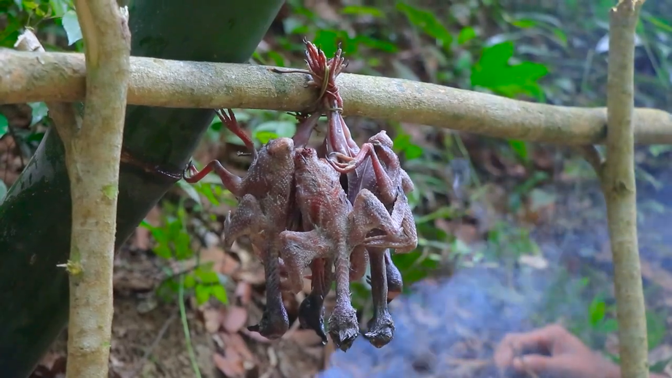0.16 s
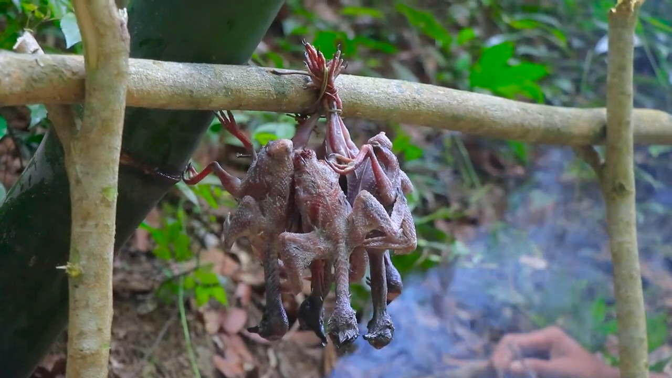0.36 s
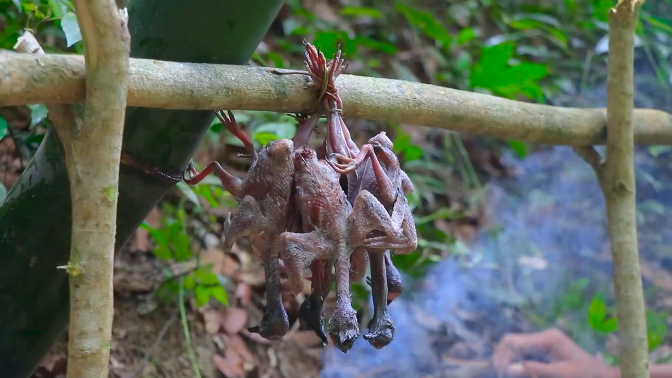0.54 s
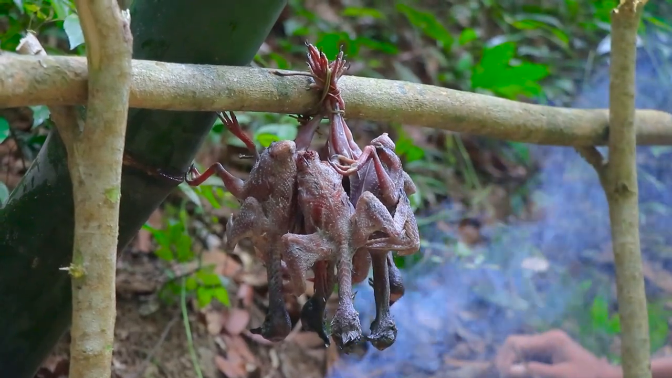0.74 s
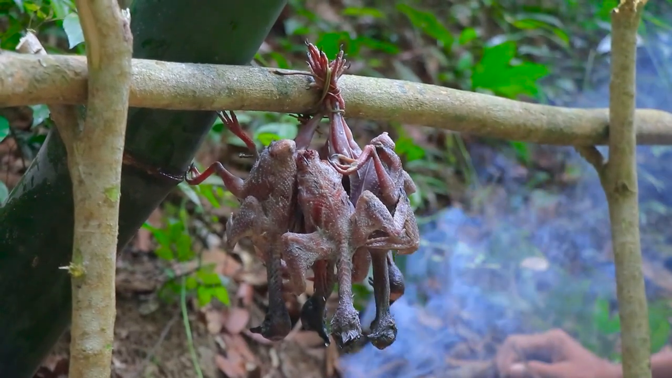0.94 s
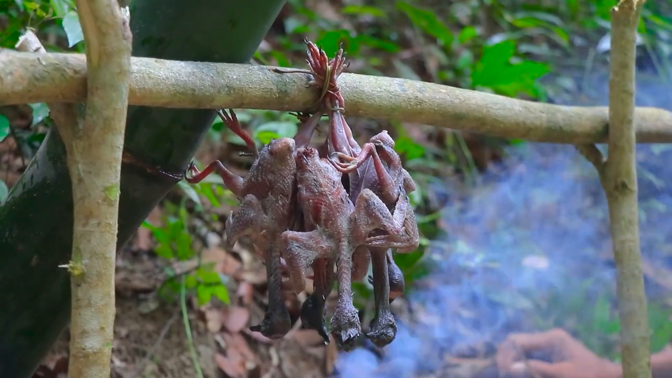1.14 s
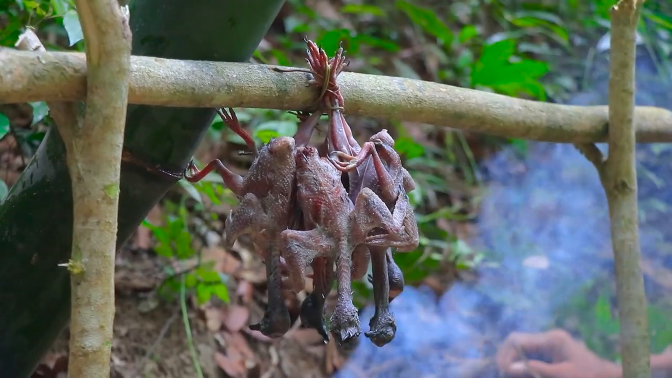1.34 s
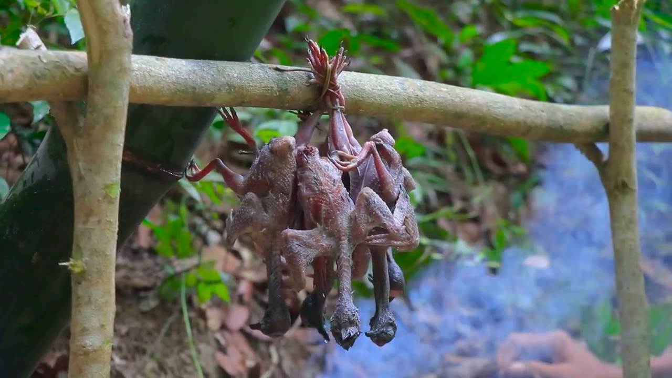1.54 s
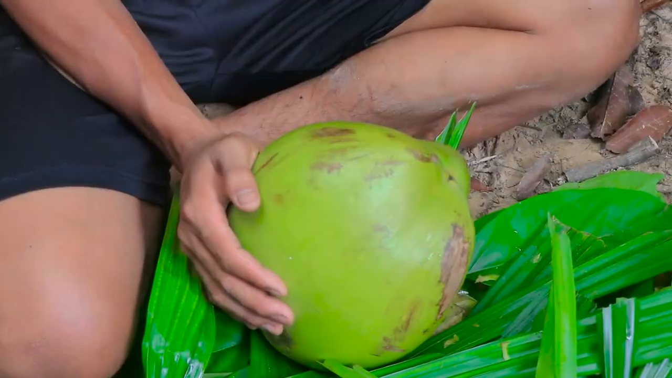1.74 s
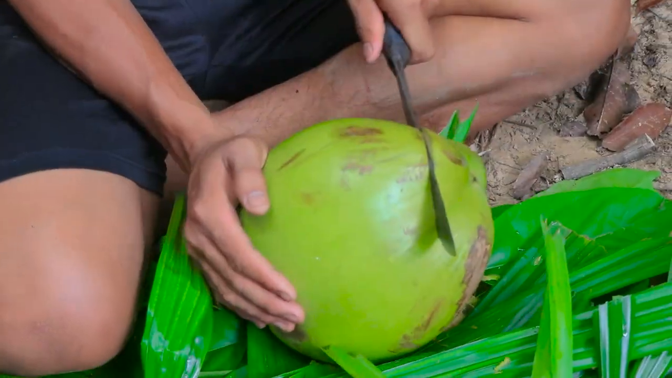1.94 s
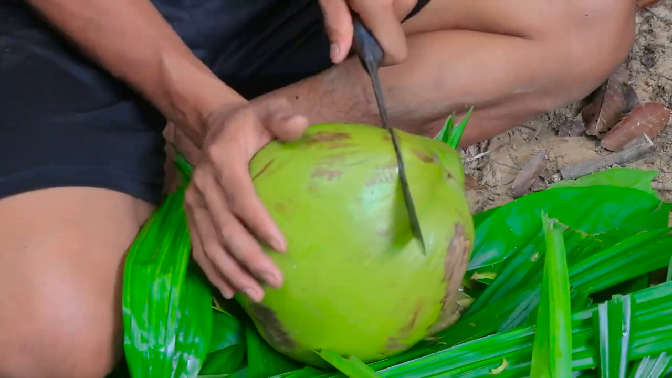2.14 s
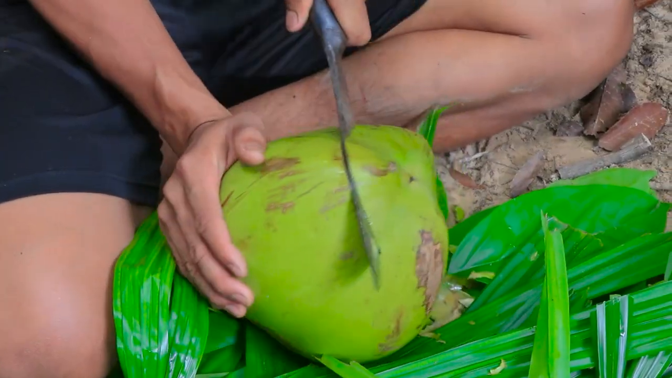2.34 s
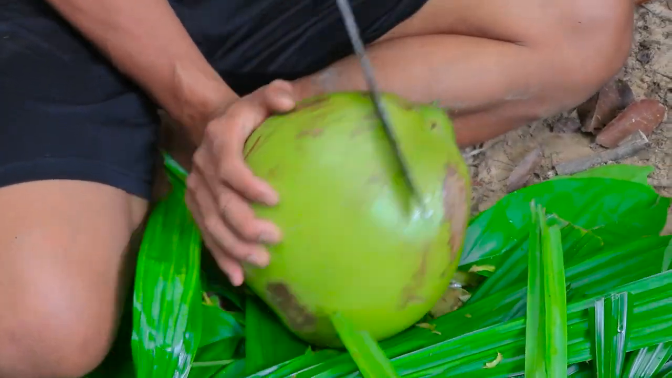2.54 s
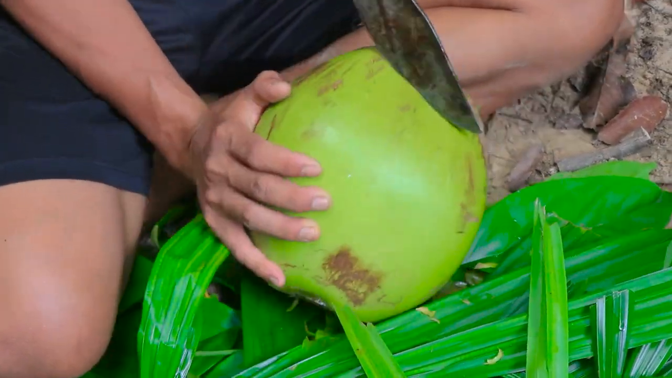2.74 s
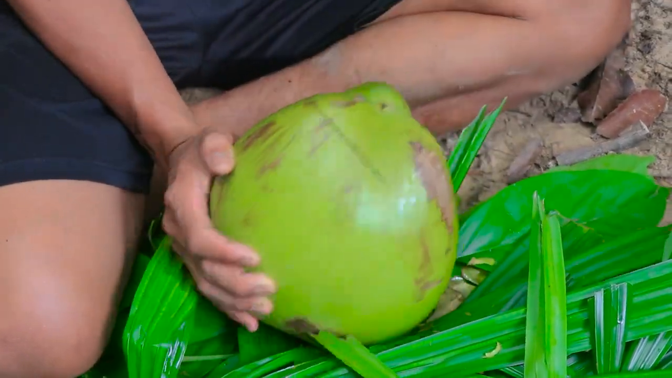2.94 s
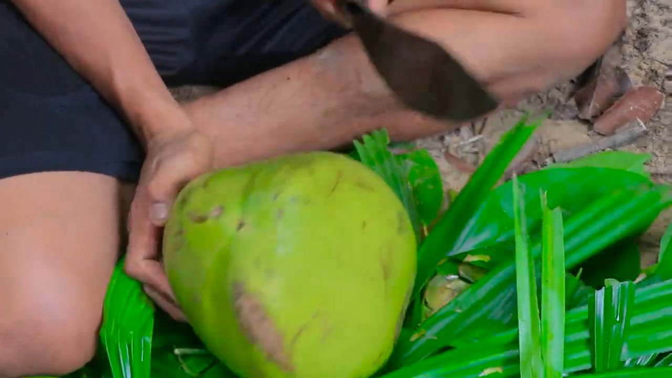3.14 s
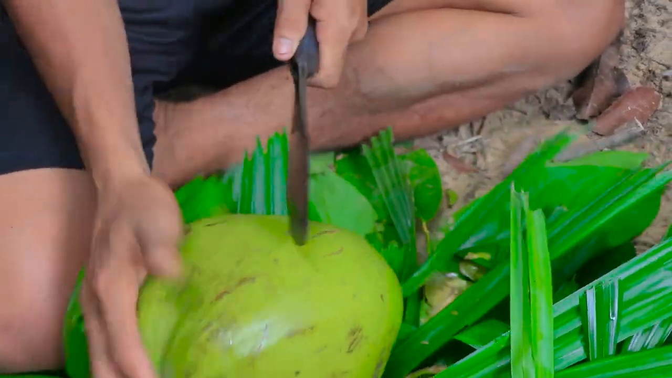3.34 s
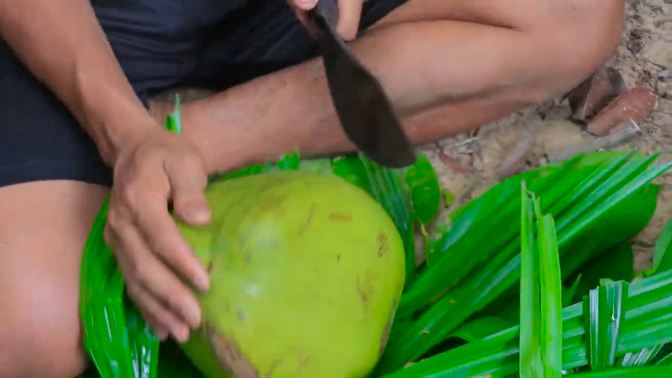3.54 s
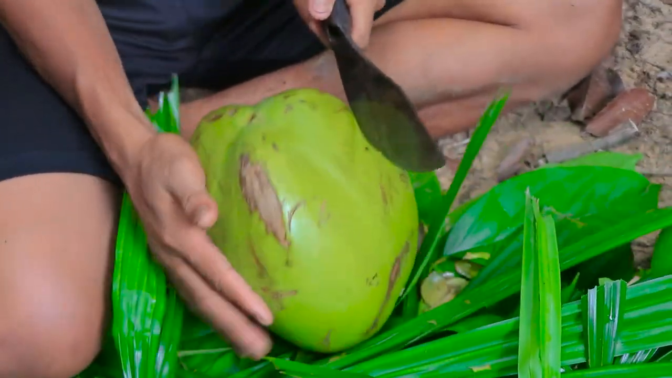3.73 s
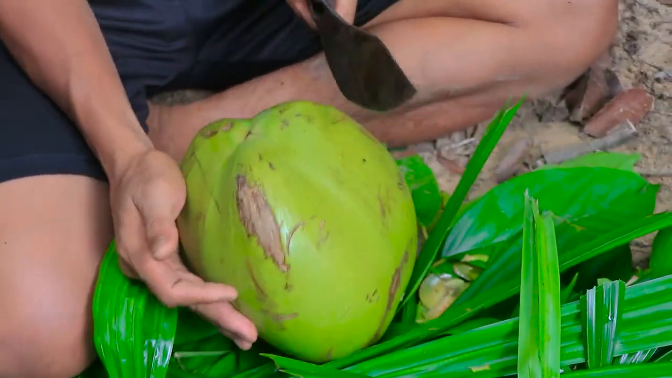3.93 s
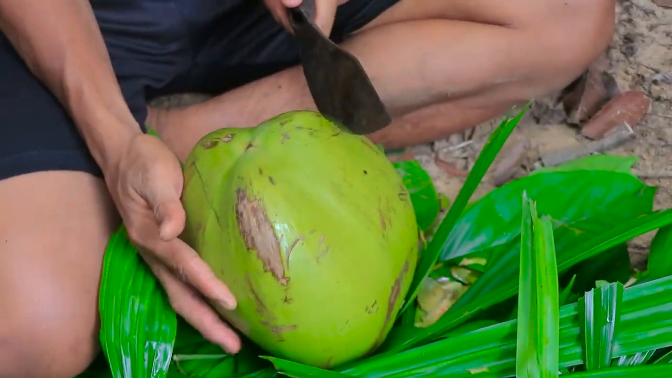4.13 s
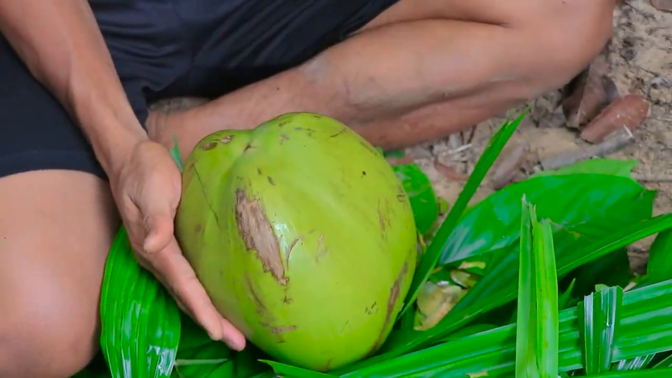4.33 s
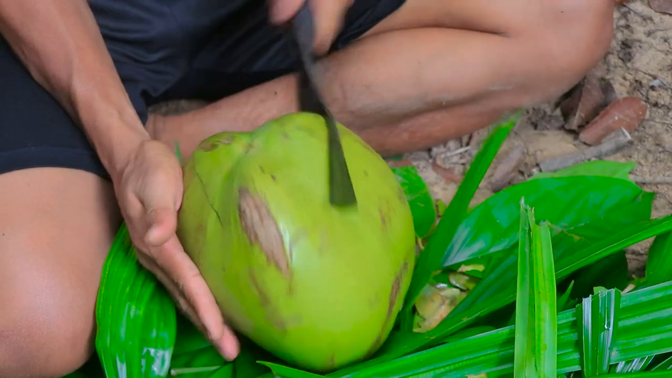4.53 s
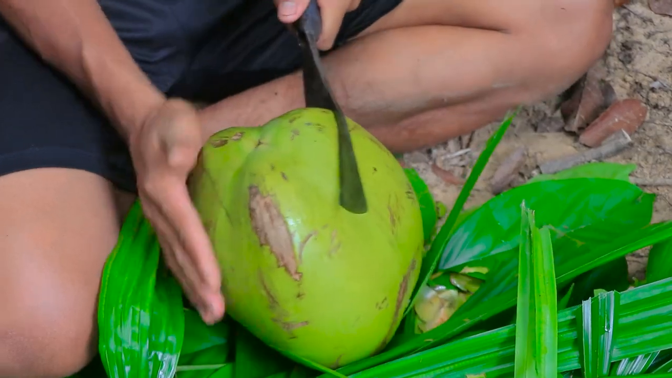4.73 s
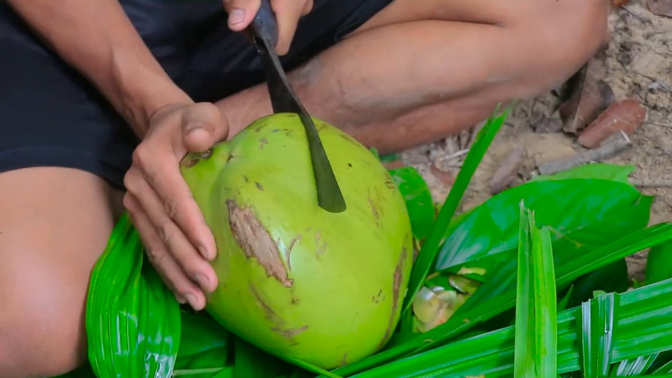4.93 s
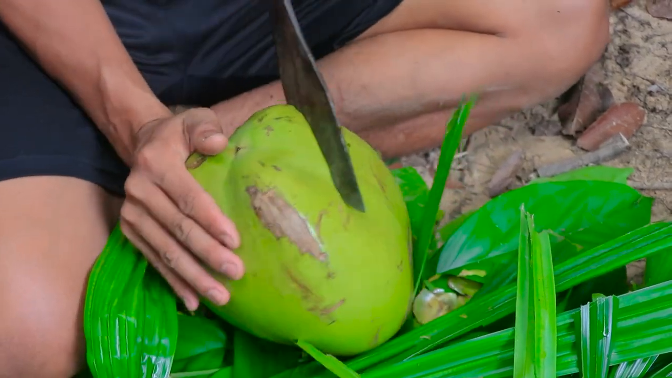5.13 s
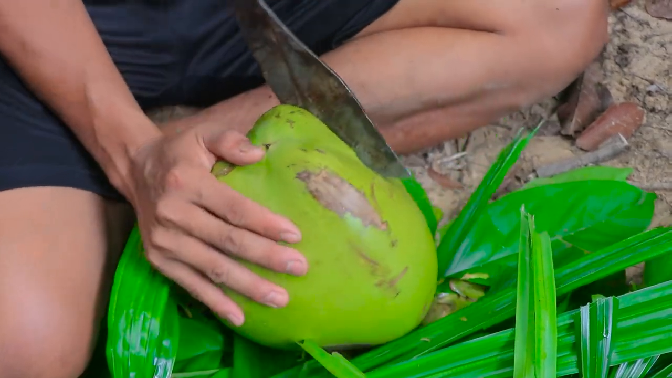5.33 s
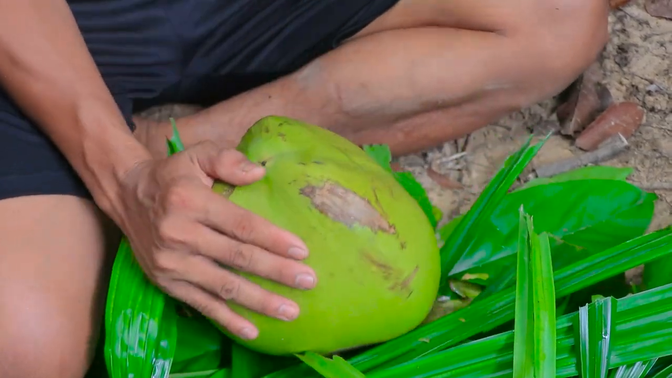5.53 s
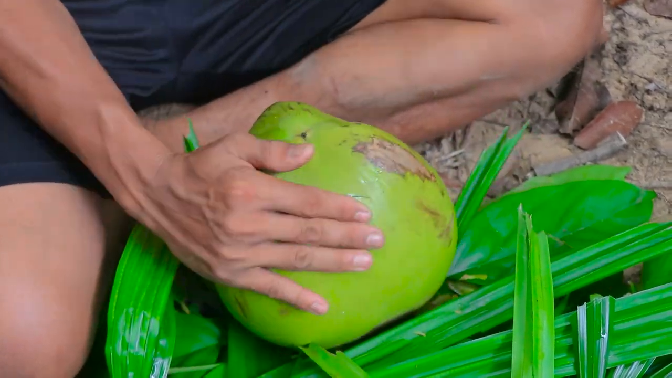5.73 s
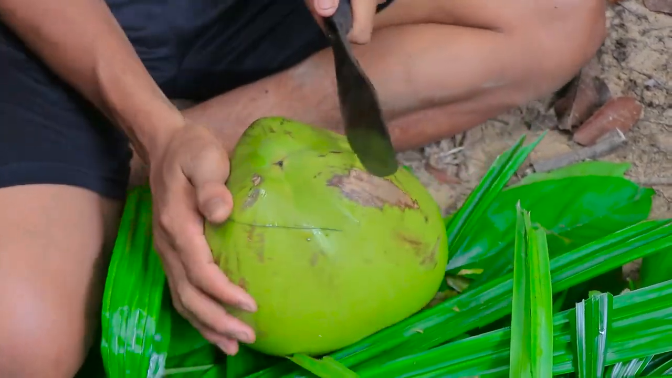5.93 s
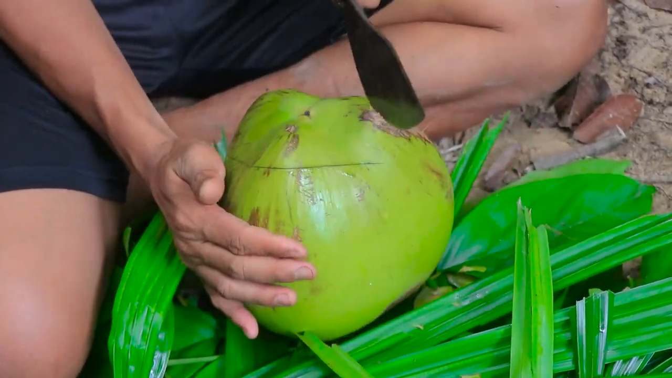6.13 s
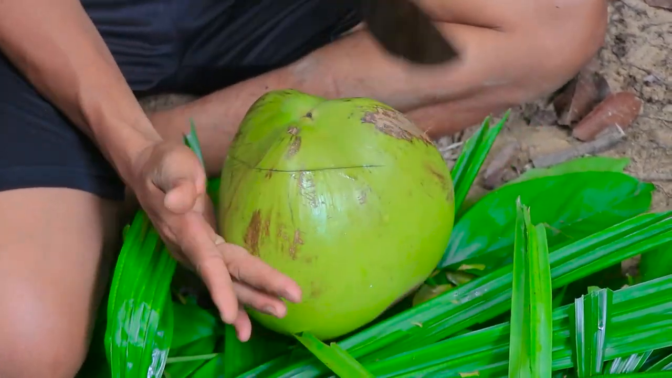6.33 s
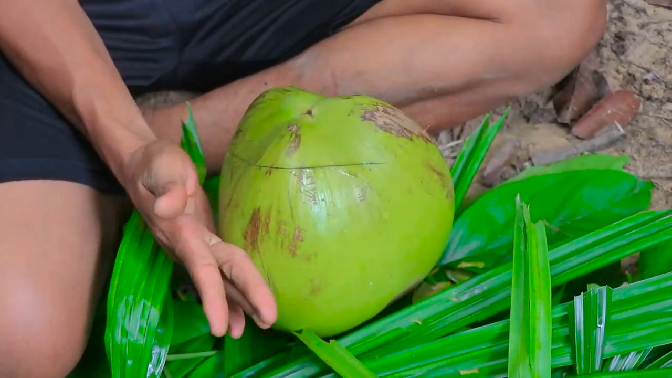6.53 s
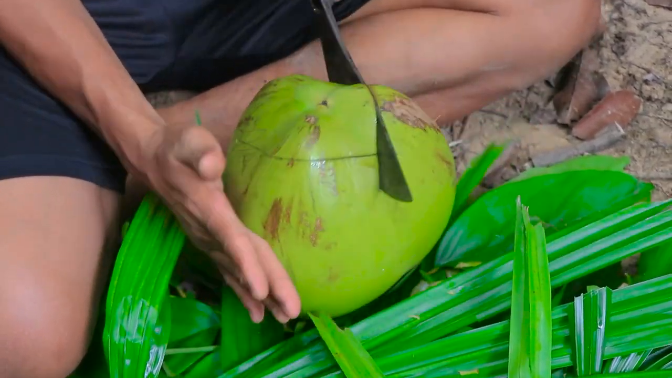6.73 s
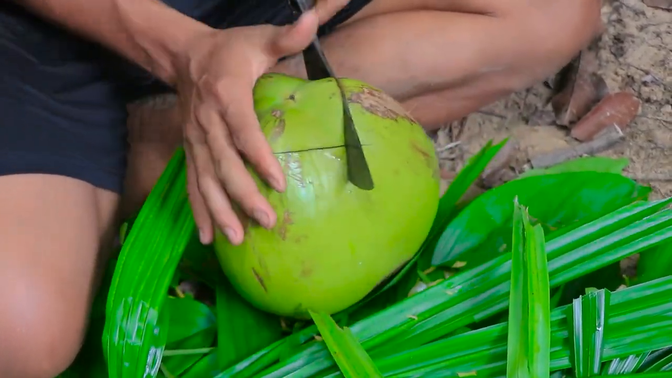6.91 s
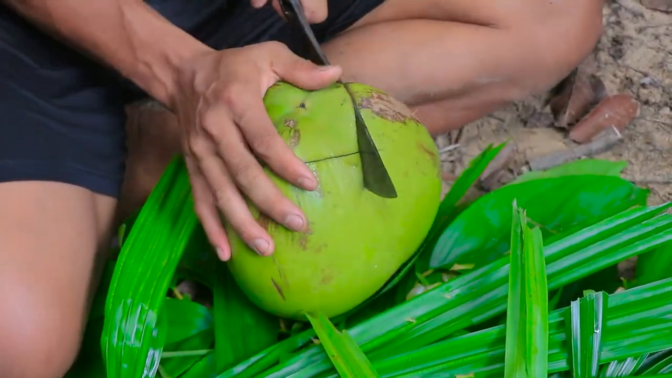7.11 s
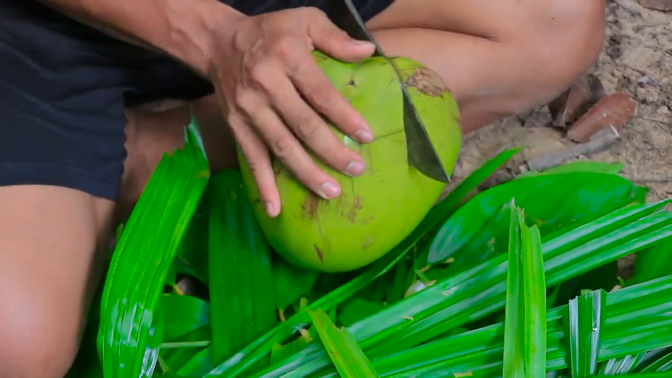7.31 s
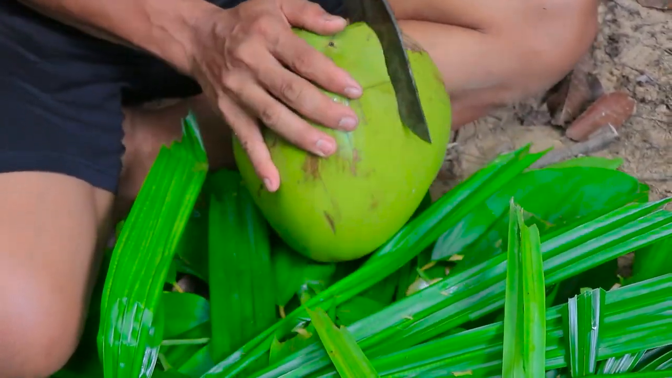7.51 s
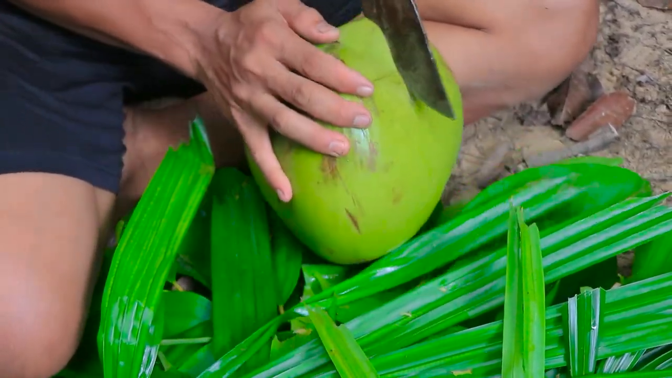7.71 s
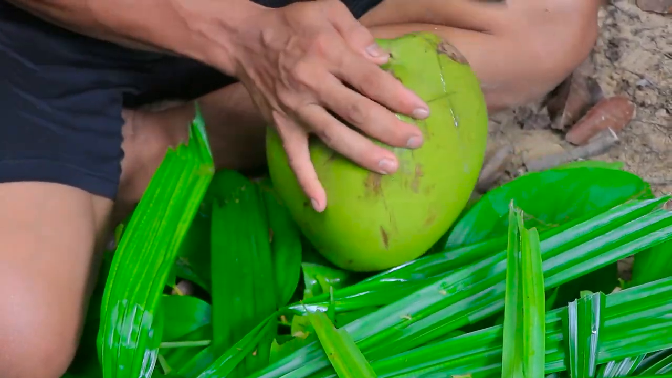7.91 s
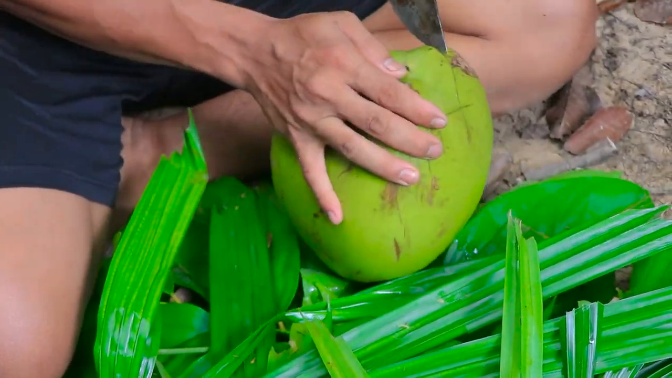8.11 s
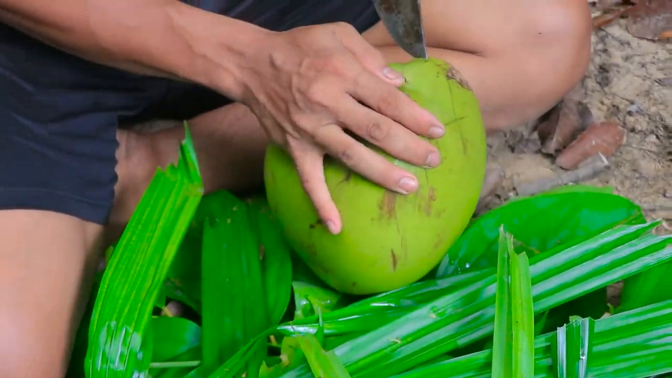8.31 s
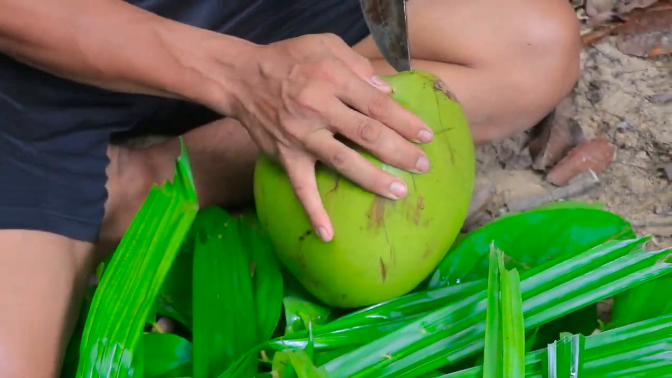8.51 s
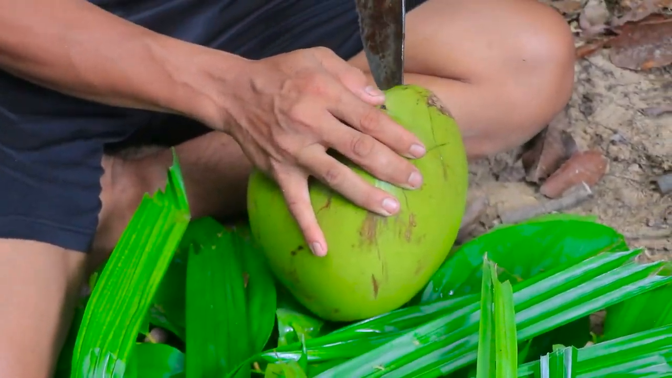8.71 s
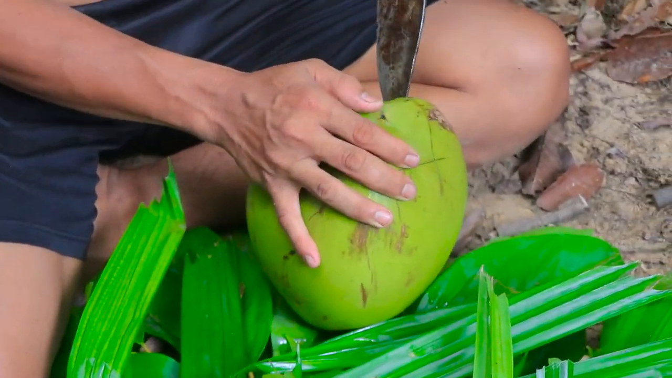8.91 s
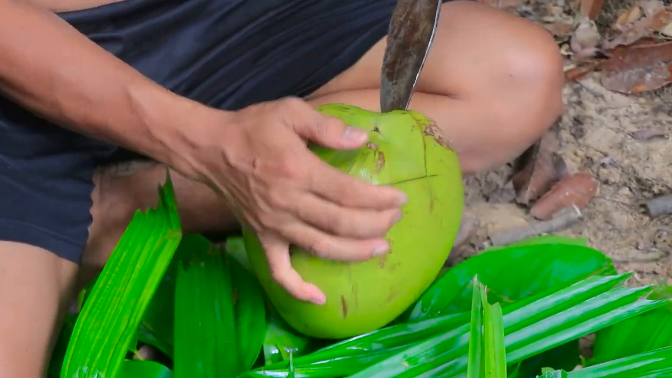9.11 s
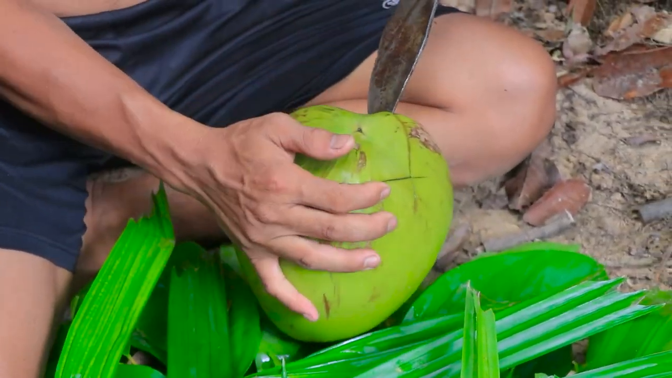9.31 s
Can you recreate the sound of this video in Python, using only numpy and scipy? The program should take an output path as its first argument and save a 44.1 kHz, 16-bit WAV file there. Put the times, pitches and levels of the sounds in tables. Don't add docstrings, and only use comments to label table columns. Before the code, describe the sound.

For the first 1.7 seconds, a low fire rumbles and hisses quietly; a bird gives a short note and a falling whistle at the very start, with dry rustles and small snaps. A fainter call comes just before the cut at 1.7, where sharp snaps sound close to one side. Quieter forest air follows. At 1.9 a knife chops a green coconut with a loud crack and hollow thud. From 2.2 to 2.8 the blade rubs and squeaks in fibre. Hands turn the nut around 2.8 to 4.2, with busy knocks, leaf crinkles and brittle snaps, thickest near 3.4. A second, mostly tearing chop lands at 4.6; the blade is wrenched and squeaks free by 5.5. Light bumps lead to the third thudding chop at 6.7. Fibre rubs and rustling at 7.4 to 7.8 fade into sparse ticks and soft leaf movement until about 9.4.

```python
import sys
import numpy as np
from scipy import signal
from scipy.io import wavfile

SR = 44100
rng = np.random.default_rng(int(sys.argv[2]) if len(sys.argv) > 2 else 0)


def natural_amplitude(level_db):
    exponent = np.asarray(level_db, float) / 20
    return 10 ** exponent


def store_pcm(level_fs):
    pcm = np.round(np.clip(level_fs, -1, 1) * 32767).astype(np.int16)
    wavfile.write(sys.argv[1], SR, np.atleast_2d(pcm).T)


N = 412776

# frequency in Hz, level in dB per Hz.
AIR = [(15, -39), (25, 0), (87, -3.5), (242, -8.5), (451, -8.5), (796, -13), (2840, -18), (5880, -31),
       (10700, -21), (16000, -33)]
# frequency in Hz, level in dB per Hz.
FIRE = [(15, -44), (25, 0.5), (92, -4), (309, -15.5), (354, -22), (384, -13.5), (489, -20), (887, -18.5),
        (6210, -32), (13600, -20.5), (16000, -20.5)]
AIR_DB, FIRE_DB, FIRE_END_S = -48.5, -44.5, 1.735
# frequency in Hz, width in Hz, level in dB.
HUMS = [
    (83, 10.3, -56),
    (100, 9, -51),
]
# time in seconds, pitch in Hz, level in dB.
BIRD = [
    [(0, 992, -38.5), (.045, 996, -40), (.07, 950, -53)],
    [(.152, 1270, -38), (.165, 1248, -39), (.18, 1217, -46), (.22, 1152, -46.5), (.25, 1108, -48.5),
     (.35, 1134, -52), (.385, 1130, -49)],
    [(1.658, 1060, -55), (1.685, 1140, -53), (1.71, 1110, -54), (1.735, 1080, -58)],
]

# frequency in Hz, level in dB per Hz.
LEAF = [(88, -34), (150, -16), (209, -16.5), (466, -15.5), (662, -17.5), (1190, -12), (1500, -8.5),
        (6020, -15.5), (8560, 0.5), (12900, -6), (16000, -18)]
# frequency in Hz, level in dB per Hz.
FIBRE = [(120, -69), (250, -38), (387, -12), (482, -23), (1080, -9.5), (1370, -24.5), (1810, -6.5),
         (4900, -12), (6200, -22), (9930, -17), (16000, -29)]
# frequency in Hz, level in dB per Hz.
TEAR = [
    [(210, -35), (350, -1.5), (3450, -5), (6030, -18), (7190, -11), (13400, -14), (16000, -21)],
    [(210, -25), (350, -13), (1500, -4), (4310, -5.5), (6970, -8.5), (13400, -16), (16000, -30)],
    [(290, -42), (500, -7.5), (1550, -5), (4870, -10), (7640, -14), (9770, -9), (16000, -21)],
]
# frequency in Hz, left-right likeness (1 = mono).
AIR_ALIKE = [(60, 1), (380, 0.39), (2380, -0.13), (15000, -0.11)]
# frequency in Hz, left-right likeness (1 = mono).
LEAF_ALIKE = [(60, 1), (380, 1), (2380, 0.37), (15000, 0.024)]
# frequency in Hz, left-right likeness (1 = mono).
CUT_ALIKE = [(60, 0.87), (380, 0.98), (2380, 0.84), (15000, 0.41)]
# frequency in Hz, left over right in dB.
LEAN = [(60, -1.5), (380, 0.5), (2380, -2), (15000, -4)]
LOW_HZ, HIGH_HZ = 700, 5800
NUT_HZ, NUT_WIDTH_HZ = 430, 183
SLOT_HZ, SLOT_WIDTH_HZ = 1410, 190

# time in seconds, hum in dB.
ROLL = [(0, -56), (.283, -55.5), (1.698, -58.5), (1.95, -42.5), (1.99, -50), (3.414, -42), (3.53, -41.5),
        (3.59, -35.5), (4.332, -69.5), (4.649, -57), (6.6, -62.5), (6.72, -47.5), (7.05, -68),
        (7.485, -46.5), (7.744, -49.5), (7.836, -43.5), (8.8, -62.5), (9.3, -54)]
# peak in seconds, peak in dB, rise in seconds, fall in seconds.
STIRS = [(.347, -28, 0.074, 0.047), (.64, -44, 0.46, 0.14), (.868, -37.5, 0.04, 0.21),
         (1.39, -50, 0.27, 0.045), (1.685, -48, .03, .06), (1.89, -39.5, 0.045, 0.19),
         (2.28, -48, 0.037, .1), (2.36, -36, 0.073, 0.089), (2.598, -35.5, 0.12, 0.18),
         (2.83, -37, 0.19, 0.069), (3.03, -45, 0.19, 0.49), (3.33, -31, 0.34, 0.13), (3.7, -39, 1, 0.42),
         (4.11, -50, 0.33, 0.081), (4.625, -42, 0.032, 0.12), (4.69, -42.5, 0.088, .045),
         (5.0, -50.5, .6, .4), (5.366, -39.5, 0.13, .1), (5.519, -43.5, 0.17, .04), (5.739, -43, 0.17, .1),
         (5.948, -46, 0.12, 0.079), (6.08, -46, .07, 0.36), (6.768, -40, .1, .04), (7.02, -46, 0.26, 0.057),
         (7.19, -38.5, .04, .5), (7.685, -40, 0.53, 0.02), (7.818, -39.5, 0.07, 0.47),
         (8.41, -45, 0.45, 0.1), (8.598, -50, 0.069, 0.2), (8.93, -49, .04, .03), (9.215, -44, .15, 0.072),
         (9.34, -49, .08, .1)]
STIR_DROP_DB = 12
STIR_ROUNDNESS = 1.36
BED_DB, BED_FOLLOWS = -51, 0.94
HISS_DB, HISS_FOLLOWS = -42.5, 0.86
STIR_HUM_DB = -13.5
DRY_LITTER_HZ = 2200

# start in seconds, length in seconds, first dB, last dB.
BITES = [(1.886, 0.024, -30, -31), (2.224, 0.026, -39, -46), (2.25, 0.04, -44, -32),
         (2.272, 0.052, -33.5, -45.5), (5.9, 0.05, -40, -35.5), (7.386, .026, -31, -26),
         (7.404, .065, -23.5, -34.5)]
# start in seconds, length in seconds, first dB, last dB.
SLIDES = [(2.476, 0.023, -47, -31), (2.49, .095, -29, -33), (2.73, 0.074, -47, -38),
          (2.79, 0.033, -32, -26), (7.459, 0.063, -33.5, -36), (7.513, .062, -36, -30),
          (7.567, .13, -36.5, -37), (7.743, .036, -34, -40), (5.0225, .0275, -26, -31),
          (5.044, .028, -34, -31)]
# start in seconds, length in seconds, first dB, last dB.
WRENCHES = [
    (5.066, .1, -27, -24),
    (5.163, .06, -30, -30),
    (5.214, .016, -33, -44),
]
# start in seconds, length in seconds, first dB, last dB.
SKIDS = [
    (7.774, .03, -33.5, -31.5),
]
# start in seconds, length in seconds, first dB, last dB.
TWISTS = [
    (5.455, .03, -25.5, -27),
    (5.48, .022, -26, -32),
]
# start in seconds, length in seconds, first dB, last dB.
DRAGS = [(3.245, .055, -41, -40), (7.385, .035, -39, -39), (7.47, .04, -42, -42), (8.58, .14, -57, -55),
         (2.585, .14, -46, -48)]
# hollow in dB, hiss in dB, slot in dB, edge in seconds, thin below in Hz.
BITE = (-3.5, -15, -5.5, .006, 300)
SLIDE = (-10.5, -7.5, -7, .006, 300)
WRENCH = (-9, -3, -4, .004, 300)
SKID = (-27, 4, -12, .008, 1600)
TWIST = (-25, -1.5, -20, .003, 1500)
DRAG = (-20, -20, 6, .01, 1000)
# start in seconds, length in seconds, slips per second at
# start in Hz, at end in Hz, level in dB, tilt in dB per overtone.
SQUEAKS = [(2.757, 0.043, 1365, 1300, -34.5, -2.5), (2.49, .012, 720, 880, -30, -1.5),
           (2.4995, .015, 1150, 1330, -27, -6), (2.509, .009, 810, 840, -33, 0.1),
           (5.455, .013, 1300, 1620, -26, -2), (5.468, .016, 1560, 1640, -22.5, -16)]

# time in seconds, peak in dB, colour in Hz, thump in dB above peak, bright in # dB
POPS = [
    (1.7385, -16, 700, -5, -13),
    (1.782, -28, 600, -6, -20),
    (1.7535, -29, 1100, -6, -24),
    (1.773, -21.5, 1680, -6.5, -3),
    (1.789, -16, 5700, -23, -1.5),
]
POPS_PAN_DB, POP_THUMP_HZ = -23.5, 170
# time in seconds, peak in dB, colour in Hz, bright in dB above peak.
SNAPS = [(0.218, -33, 1063, -2), (0.261, -18, 1130, -29), (0.905, -28, 4500, -4), (0.992, -27, 2600, -8),
         (1.298, -39, 870, 6), (1.422, -25.5, 4300, -6), (2.02, -26, 1300, -28), (2.122, -27, 1590, -11.5),
         (2.561, -13, 1700, -25), (2.922, -27, 1440, -12), (7.928, -31, 4000, 0), (3.406, -11.5, 2870, -21),
         (3.437, -11, 2400, -13), (3.585, -19, 5200, -8), (3.59, -9.5, 1080, -31), (3.669, -25, 6500, -4),
         (5.318, -12.5, 3800, -20), (5.396, -26, 2200, -19), (5.426, -17, 3100, -25),
         (5.637, -24.5, 2190, -26), (5.974, -33, 4630, -2), (6.752, -23, 2920, -30),
         (6.98, -28.5, 3100, -4), (8.07, -22, 2950, -27), (8.237, -24, 2860, -21), (8.28, -18, 3600, -11),
         (8.561, -24, 2500, -20), (8.933, -33, 6000, -2)]
# time in seconds, peak in dB, colour in Hz, bright in dB above
MORE_SNAPS = [(2.5024, -16, 2590, -18), (2.5184, -18, 2320, -18), (2.5284, -16, 1600, -18),
              (2.9981, -28, 1730, -18), (3.2021, -22, 2160, -18), (3.3094, -20, 2260, -18),
              (3.4514, -21, 1400, -18), (3.478, -24, 1500, -18), (3.7549, -23, 3580, -18),
              (3.911, -34, 3240, -18), (5.245, -32, 3430, -18), (5.3393, -28, 2280, -18),
              (7.4095, -17, 2440, -26), (7.5906, -21, 2940, -18), (8.1404, -35, 1560, -18),
              (9.0438, -39, 2510, -18), (9.1092, -37, 3060, -18), (9.1401, -36, 2400, -18)]
# time in seconds, peak in dB, colour in Hz, bright in dB above peak.
CLICKS = [(3.4368, -6, 4200, -10), (3.4372, -6, 1900, -30), (1.888, -16.5, 1300, -25),
          (.381, -30, 2400, -20), (2.145, -33, 2300, -20), (3.0313, -26, 1550, -18),
          (3.5516, -26, 3380, -18), (3.602, -21, 6000, -6), (7.303, -28, 1920, -18),
          (7.3928, -20, 1520, -28), (7.9545, -30, 1200, -18), (8.3172, -31, 1500, -18),
          (7.1588, -33, 2020, -18)]
# time in seconds, peak in dB, colour in Hz, hollow in dB above peak.
TAPS = [(2.23, -30, 2110, 2.5), (2.237, -22.5, 830, -14), (2.87, -18, 1610, -20), (2.897, -17, 1300, -20),
        (3.165, -19, 1420, -10), (3.295, -14.5, 1450, -12), (3.346, -12.5, 1680, -8),
        (3.358, -20, 3550, -13.5), (3.638, -15, 900, -8.5), (3.682, -12, 1120, -10),
        (6.175, -26, 2090, -12), (8.187, -36, 1430, 2.5)]
# time in seconds, peak in dB, colour in Hz, hollow in dB above peak.
BUMPS = [(0.381, -25, 1340, -14), (3.603, -21, 1010, -4), (3.785, -17.5, 1820, -14), (4.029, -23, 815, -2),
         (4.145, -21, 1360, -17), (5.957, -25.5, 1380, -15), (6.204, -32, 1440, -4), (4.046, -26, 1200, -8),
         (3.4365, -11, 6000, -30), (3.53, -26, 800, -6), (8.19, -28, 2500, -20)]
SNAP_HOLLOW_DB, TAP_BRIGHT_DB, BUMP_BRIGHT_DB, MORE_SNAPS_LIFT_DB = -26.5, -26, -9, 4

# start in seconds, pitch in Hz, level in dB, push in seconds, 60 dB decay in seconds.
RINGS = [(1.888, 375, -13.5, 0.0032, 0.06), (1.889, 944, -17, 0.00045, 0.031),
         (1.898, 417, -13.5, 0.011, 0.03), (2.23, 205, -36.5, 0.021, 0.1), (2.82, 1330, -30, 0.0028, .015),
         (7.746, 1594, -27.5, 0.0077, 0.033), (7.792, 2300, -27, 0.0042, .02),
         (2.82, 11000, -29, 0.0024, 0.055), (3.17, 454, -26, .008, 0.063), (3.318, 500, -22, 0.0015, 0.05),
         (3.687, 1180, -26, 0.0014, 0.021), (3.591, 1100, -17.5, 0.002, .02),
         (3.687, 430, -25, 0.0049, 0.16), (3.76, 397, -25.5, 0.0078, 0.034), (5.146, 1372, -19, 0.02, .008),
         (5.492, 3400, -36, .003, 0.18), (5.97, 4600, -43, .004, .06), (7.533, 1480, -26, 0.02, 0.037),
         (7.538, 489, -26.5, 0.019, 0.055), (7.668, 970, -30, 0.0094, .03), (0.992, 510, -38, .004, 0.027),
         (7.86, 454, -33, 0.0088, .05), (7.928, 3390, -37.5, .005, 0.094),
         (8.281, 2710, -26.5, .002, 0.021), (7.678, 2700, -29, .004, .03), (4.598, 3400, -14, .0004, .014),
         (4.607, 400, -28, .005, .04), (4.598, 950, -12, .001, .022), (1.912, 1100, -13, .001, .035),
         (6.6778, 4900, -15, .0005, .02), (4.031, 330, -33, .006, .09), (4.5985, 1450, -14, .001, .025),
         (2.8, 3000, -32, .015, .02), (2.808, 2300, -31, .01, .02), (5.463, 3250, -28, .005, .02),
         (3.478, 500, -30, .004, .04), (5.028, 2430, -31, .006, .03), (5.03, 950, -30, .008, .03),
         (5.034, 480, -27.5, .006, .04), (5.492, 400, -32, .004, .03), (7.755, 2200, -34, .008, .03),
         (7.779, 4200, -31, .009, .025), (7.786, 3300, -32, .007, .02), (8.36, 9400, -47, .02, .06),
         (8.425, 10700, -46, .008, .04), (8.466, 10500, -46, .004, .03),
         (6.6815, 520, -17, .002, .03), (6.6785, 1430, -15, .001, .025), (6.6785, 1030, -16, .001, .03),
          (6.701, 450, -38, .004, .04), (4.619, 440, -36, .004, .025), (4.598, 2250, -14, .0006, .02),
          (3.338, 400, -23, .002, .035), (3.308, 2600, -24, .001, .015), (3.357, 3500, -24, .002, .02),
          (3.239, 9000, -28, .001, .012), (3.297, 9400, -29, .001, .012), (3.339, 5200, -30, .001, .012),
          (7.413, 370, -24, .004, .1), (7.41, 3100, -28, .004, .04), (7.47, 3150, -34, .025, .03),
          (5.05, 3300, -30, .006, .03), (3.4375, 560, -21, .001, .025), (3.4375, 1500, -17, .001, .016),
          (2.797, 420, -29, .012, .04), (5.427, 3300, -24, .001, .015), (8.17, 430, -37, .01, .05),
          (5.036, 760, -25, .004, .015), (2.118, 1620, -33, .006, .03), (2.016, 760, -36, .006, .03),
          (.36, 1130, -44, .015, .04), (.2, 2260, -54, .03, .08)]

CHOP_S = [
    1.9118,
    4.598,
    6.6778,
]
# peak in dB, tearing length in seconds, blade stop in seconds, thud in dB, thud in Hz.
CHOPS = [
    (0, 0.0088, 0.0058, -7, 455),
    (1, 0.0066, .0064, -20.5, 393),
    (.5, 0.0078, .0075, -6.5, 415),
]
FIRST_BITE = 14
EDGE_HZ, EDGE_DECAY_S, EDGE_DB = 2500, .0004, -1.5
STEADY_CUT_HZ, CUTOFF_HZ = 15800, 16900


def rms_one(x):
    return x / np.sqrt(np.mean(x ** 2) + 1e-20)


def in_time(rows):
    s, *columns = np.transpose(rows)
    return [np.interp(np.arange(N) / SR, s, c) for c in columns]


def at_hz(points, hz):
    table_hz, values = np.transpose(points)
    return np.interp(np.log(hz), np.log(table_hz), values)


def sides(db):
    return natural_amplitude(np.array([[db / 2], [-db / 2]]))


def add(out, x, s):
    i = round(s * SR)
    out[:, i:i + x.shape[-1]] += x[..., :N - i]


def drift(rate, size=N, db=None):
    r = np.exp(-80 * np.pi * rate / SR)
    white = rng.standard_normal(size // 40 + 2002)
    slow = rms_one(signal.lfilter([1], [1, -2 * r, r * r], white)[2000:])
    values = slow if db is None else natural_amplitude(db * slow)
    return np.interp(np.arange(size) / 40, np.arange(len(slow)), values)


def resonate(x, hz, width_hz):
    r = np.exp(-np.pi * width_hz / SR)
    poles = [1, -2 * r * np.cos(2 * np.pi * hz / SR), r * r]
    return signal.lfilter([(1 - r * r) / 2, 0, (r * r - 1) / 2], poles, x)


def grains(per_s, spread_db, size=N):
    sizes = natural_amplitude(spread_db * np.minimum(rng.exponential(1, size), 5))
    sizes = sizes * (rng.random(size) < per_s / SR)
    return rms_one(sizes * rng.standard_normal((2, 2, size)))


def crunch(per_s, spread_db, size=N):
    snaps, dealt = grains(per_s, spread_db, size)[0], rng.integers(0, 12, size)
    mid, side = sum(resonate(snaps * (dealt == k) + 1e-18, hz, 0.054 * hz)
                    for k, hz in enumerate(np.geomspace(900, 3900, 12)))
    return rms_one(sides(-5) * (mid + 0.36 * side * [[1], [-1]]))


def coloured(white, spectrum, alike, patchy_db):
    size = white.shape[-1]
    parts, edges = np.zeros((3, 2, size)), 22 * 2 ** np.arange(0, 9.7, 1 / 3)
    for k, (low, high) in enumerate(zip(edges, edges[1:])):
        hz = np.sqrt(low * high)
        if hz < spectrum[0][0] / 2 or hz > 2 * spectrum[-1][0]:
            continue
        band_pass = signal.butter(2, [low, high], "band", fs=SR, output="sos")
        band = signal.sosfilt(band_pass, white[k % 2])
        if patchy_db:
            band = band * drift(17.4, size, patchy_db)
        c = np.clip(at_hz(alike, hz), -1, 1)
        width = np.sqrt([1 + c, 1 - c]) * [[1, 0.99], [1, -0.98]]
        matrix = natural_amplitude(at_hz(spectrum, hz)) * sides(at_hz(LEAN, hz)) * width
        parts[int(hz > LOW_HZ) + int(hz > HIGH_HZ)] += matrix @ band
    return parts


def hum(hz, width_hz, db):
    once = resonate(rng.standard_normal(N), hz, width_hz)
    return natural_amplitude(db) * rms_one(resonate(once, hz, width_hz))


def forest():
    n = round(FIRE_END_S * SR)
    air = coloured(rng.standard_normal((2, 2, N)), AIR, AIR_ALIKE, patchy_db=2.5).sum(0)
    fire = coloured(rng.standard_normal((2, 2, n)), FIRE, AIR_ALIKE, patchy_db=-1.0).sum(0)
    steady, by_fire = (hum(*row) for row in HUMS)
    out = natural_amplitude(AIR_DB) * rms_one(air)
    out[:, :n] = (natural_amplitude(FIRE_DB) * rms_one(fire) + by_fire[:n])[:, ::-1]
    return out + steady[::-1]


def bird():
    call, flutter = np.zeros(N), drift(54)
    for rows in BIRD:
        start_s, end_s = rows[0][0], rows[-1][0]
        on = slice(round(start_s * SR), round(end_s * SR))
        hz, level_db = (c[on] for c in in_time(rows))
        far = start_s > 0
        phase = 2 * np.pi * np.cumsum(hz * (1 + .018 * flutter[::-1][on] * far)) / SR
        level = natural_amplitude(level_db + 6.0 + 4.0 * flutter[on] * far)
        whistle = np.sin(phase) + 0.05 * np.sin(2 * phase)
        call[on] = level * signal.windows.tukey(len(hz), .1) * whistle
    t = np.arange(SR // 2) / SR
    trunks = rng.standard_normal((2, len(t))) * natural_amplitude(-60 * t / .9 - 43) * (t > .01)
    return sides(-6.5) * call + signal.fftconvolve(call[None], trunks, axes=1)[:, :N]


def stirring():
    t, power = np.arange(0, N + 40, 40) / SR, 1e-12
    for s, peak_db, rise_s, fall_s in STIRS:
        away = np.where(t < s, (s - t) / rise_s, (t - s) / fall_s)
        power = power + natural_amplitude(peak_db - STIR_DROP_DB * away ** STIR_ROUNDNESS) ** 2
    return np.interp(np.arange(N) / SR, t, 10 * np.log10(power))


def leaves():
    roll_db, stir_db = in_time(ROLL)[0], stirring()
    rustle = np.hypot(natural_amplitude(stir_db), natural_amplitude(BED_DB + BED_FOLLOWS * (roll_db + 50.5)))
    hiss = natural_amplitude(HISS_DB) * (100 * rustle) ** HISS_FOLLOWS
    nut_hum = np.hypot(natural_amplitude(roll_db - 0.5), natural_amplitude(stir_db + STIR_HUM_DB))
    white = grains(per_s=7000, spread_db=1.5)
    white = white * drift(25.6, db=1.7)
    low, middle, high = map(rms_one, coloured(white, LEAF, LEAF_ALIKE, patchy_db=2.5))
    snaps = crunch(per_s=700, spread_db=3.0)
    lone = white[0] * (np.abs(white[1, 0]) > 6)
    pricks = rms_one(signal.lfilter(*signal.butter(2, [5000, 13000], "band", fs=SR), lone))
    hollow = rms_one(0.65 * low + rms_one(resonate(low, NUT_HZ, NUT_WIDTH_HZ)))
    dry_litter = signal.lfilter(*signal.butter(1, DRY_LITTER_HZ, "high", fs=SR), middle)
    middle = np.where(np.arange(N) < FIRE_END_S * SR, 1.15 * dry_litter, middle)
    return nut_hum * hollow + rustle * (0.86 * middle + 0.36 * snaps) + hiss * (.9 * high + .4 * pricks)


def ticks(table, pan_db, knock_hz, crack_s):
    out, t = np.zeros((2, N)), np.arange(2600) / SR
    noise = rng.standard_normal((len(table), 2, len(t)))
    bright = signal.butter(3, [6200, 13500], "band", fs=SR, output="sos")
    knock = np.sin(2 * np.pi * knock_hz * t) * np.exp(-t / 0.003) * (1 - np.exp(-t / 0.00034))
    for (s, peak_db, hz, knock_db, bright_db), (common, own) in zip(table, noise):
        crack = (common + 0.51 * own * [[1], [-1]]) * np.exp(-t / crack_s)
        body = resonate(crack, hz, .6 * hz)
        edge = signal.sosfilt(bright, crack)
        snap = body / np.abs(body).max() + natural_amplitude(bright_db + 8.5) * edge / np.abs(edge).max()
        tick = sides(pan_db) * snap + sides(0.6 * pan_db) * natural_amplitude(knock_db + 5.5) * knock
        add(out, natural_amplitude(peak_db - 2) * tick, s + 0.00119)
    return out


def small_contacts():
    contacts = [(s, db, hz, SNAP_HOLLOW_DB, bright_db) for s, db, hz, bright_db in SNAPS]
    contacts += [(s, db + MORE_SNAPS_LIFT_DB, hz, SNAP_HOLLOW_DB, bright_db) for s, db, hz, bright_db in MORE_SNAPS]
    contacts += [(*row, TAP_BRIGHT_DB) for row in TAPS]
    contacts += [(*row, BUMP_BRIGHT_DB) for row in BUMPS]
    clicks = [(s, db, hz, SNAP_HOLLOW_DB - 12.0, bright_db) for s, db, hz, bright_db in CLICKS]
    out = ticks(POPS, POPS_PAN_DB, POP_THUMP_HZ, crack_s=.0007)
    out += ticks(contacts, -3.5, NUT_HZ, crack_s=.0017)
    return out + ticks(clicks, -3.5, NUT_HZ, crack_s=.0006)


def rubs():
    size = 2 * SR
    white = grains(per_s=6000, spread_db=2.0, size=size)
    white = white * drift(61, size, db=.7)
    low, middle, high = map(rms_one, coloured(white, FIBRE, CUT_ALIKE, patchy_db=1.2))
    slot = resonate(middle, SLOT_HZ, 2 * SLOT_WIDTH_HZ)
    slot = rms_one(resonate(slot, SLOT_HZ, SLOT_WIDTH_HZ))
    hollow = rms_one(resonate(low, NUT_HZ, 1.25 * NUT_WIDTH_HZ))
    snaps = crunch(per_s=1800, spread_db=2.5, size=size)
    kinds = ((BITES, BITE), (SLIDES, SLIDE), (WRENCHES, WRENCH), (SKIDS, SKID), (TWISTS, TWIST), (DRAGS, DRAG))
    out, used = np.zeros((2, N)), 0
    for strokes, (hollow_db, hiss_db, slot_db, edge_s, thin_hz) in kinds:
        rasp = signal.lfilter(*signal.butter(2, thin_hz, "high", fs=SR), 0.77 * middle + 0.61 * snaps)
        rub = rasp + natural_amplitude(hollow_db) * hollow + natural_amplitude(hiss_db) * high + natural_amplitude(slot_db) * slot
        for s, lasts_s, first_db, last_db in strokes:
            t = np.arange(round(lasts_s * SR)) / SR
            used += SR // 17
            edges = np.clip(np.minimum(t, lasts_s - t) / edge_s, 0, 1)
            level = natural_amplitude(first_db + (last_db - first_db) * t / lasts_s)
            add(out, edges * level * rub[:, used:used + len(t)], s)
    return out


def squeaks():
    out = np.zeros((2, N))
    for s, lasts_s, start_hz, end_hz, level_db, tilt_db in SQUEAKS:
        hz = np.linspace(start_hz, end_hz, round(lasts_s * SR))
        phase = 2 * np.pi * np.cumsum(hz * (1 + 0.012 * drift(48, len(hz)))) / SR
        comb = sum(natural_amplitude(tilt_db * k + 2.5 * drift(40, len(hz))) * np.sin((k + 1) * phase) for k in range(6))
        add(out, natural_amplitude(level_db) * sides(-2.5) * signal.windows.tukey(len(hz), .5) * comb, s)
    return out


def rings():
    out, t = np.zeros((2, N)), np.arange(9000) / SR
    for s, hz, level_db, push_s, t60 in RINGS:
        swell = np.sin(np.pi / 2 * np.minimum(t / push_s, 1))
        decay = natural_amplitude(-60 * np.maximum(t - push_s, 0) / t60)
        tone = swell * decay * np.sin(2 * np.pi * hz * t)
        add(out, natural_amplitude(level_db) * sides(at_hz(LEAN, hz)) * tone, s)
    return out


def chops():
    out, t = np.zeros((2, N)), np.arange(4000) / SR
    noise = rng.standard_normal((len(CHOPS), 2, 2, len(t)))
    rind = natural_amplitude(EDGE_DB) * np.sin(2 * np.pi * EDGE_HZ * t) * np.exp(-t / EDGE_DECAY_S)
    for s, (peak_db, tear_s, stop_s, thud_db, thud_hz), white, spectrum in zip(CHOP_S, CHOPS, noise, TEAR):
        white[:, 0, 0] = FIRST_BITE
        tearing = np.exp(-t / .0058) / (1 + (t / tear_s) ** 6) + .03 * np.exp(-t / .012)
        low, middle, high = coloured(white * tearing, spectrum, CUT_ALIKE, patchy_db=0.5)
        tear = low + middle + high * np.exp(-t / .005) * 1.6
        tear = tear + .6 * resonate(tear, SLOT_HZ, 400)
        add(out, natural_amplitude(peak_db) * tear / np.abs(tear).max(), s)
        add(out, np.array([rind] * 2), s)
        thud = -np.sin(2 * np.pi * thud_hz * t) * np.exp(-(t / .0047) ** 1.5)
        jolt = -np.sin(2 * np.pi * 2.2 * thud_hz * t) * np.exp(-t / .0012)
        add(out, natural_amplitude(thud_db) * np.array([thud + 0.7 * jolt] * 2), s + stop_s)
    no_bass = signal.butter(4, 300, "high", fs=SR, output="sos")
    return signal.sosfilt(no_bass, out)


def scene():
    top_cut = signal.ellip(10, .5, 60, STEADY_CUT_HZ, fs=SR, output="sos")
    steady = signal.sosfilt(top_cut, forest() + leaves() + rubs())
    return steady + bird() + small_contacts() + squeaks() + rings() + chops()


def roll_off(x):
    return signal.sosfilt(signal.butter(12, 16470, fs=SR, output="sos"), x)


def record(dry):
    soft = 1.3 * np.tanh(dry / 1.3)
    cut = signal.sosfilt(signal.cheby2(12, 60, CUTOFF_HZ, fs=SR, output="sos"), soft)
    cut = signal.sosfilt(signal.butter(4, 39, "high", fs=SR, output="sos"), cut)
    return roll_off(cut)


dry = scene()
out = record(dry)
store_pcm(out)
```